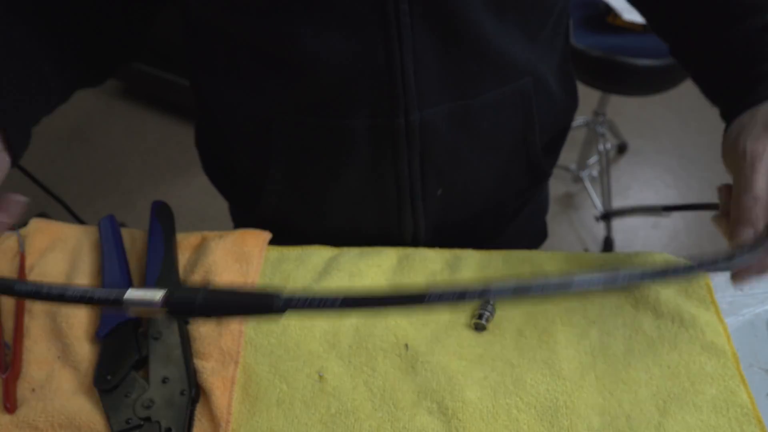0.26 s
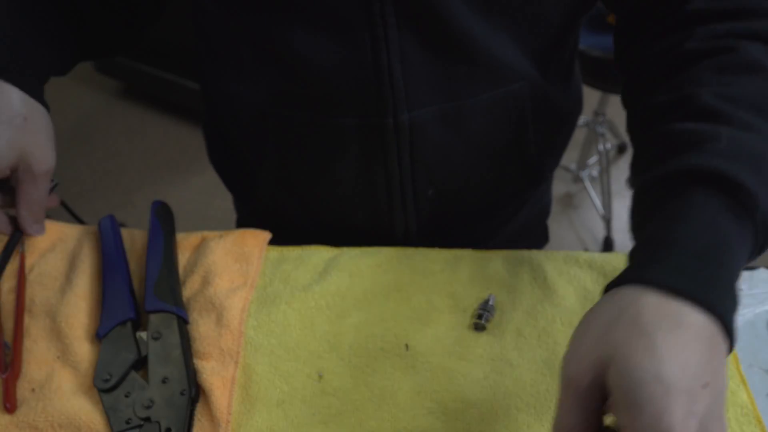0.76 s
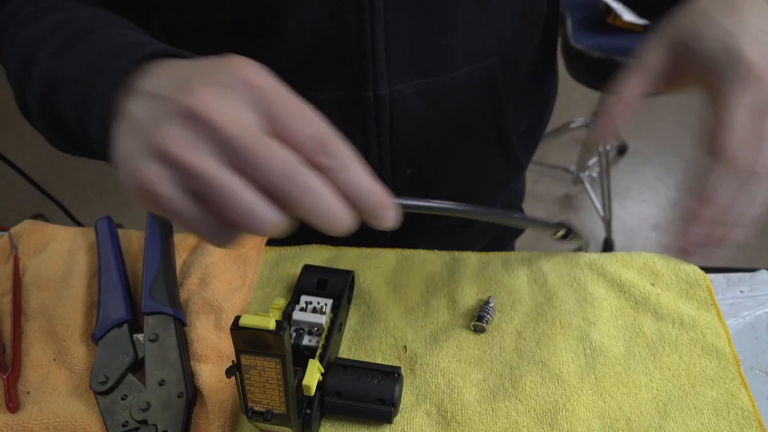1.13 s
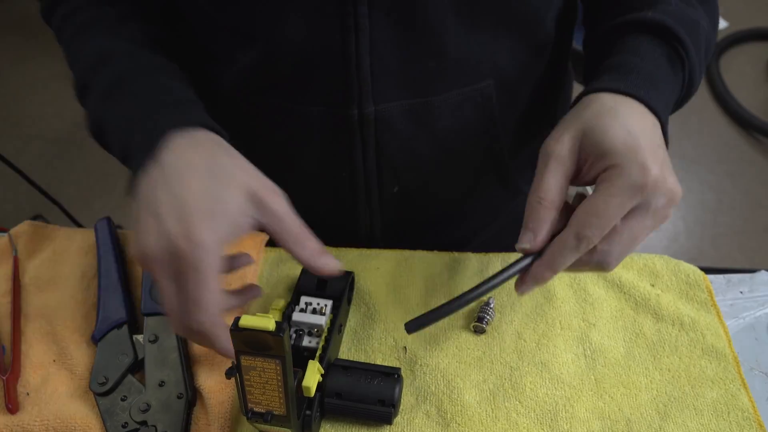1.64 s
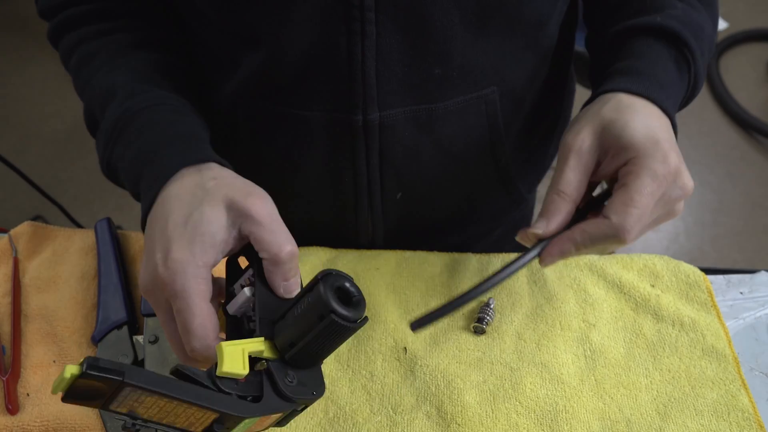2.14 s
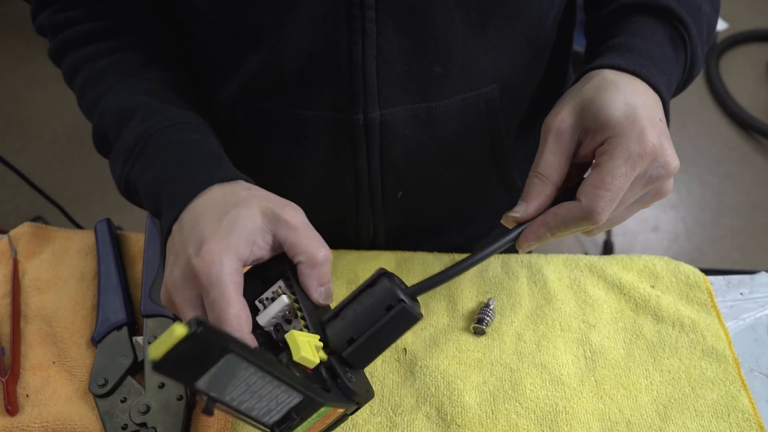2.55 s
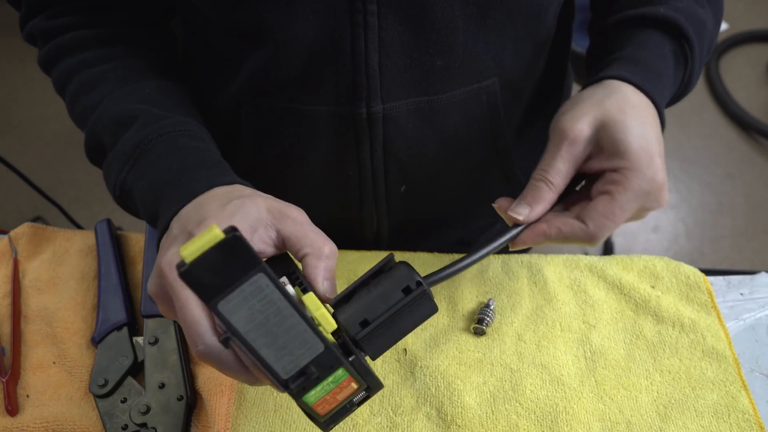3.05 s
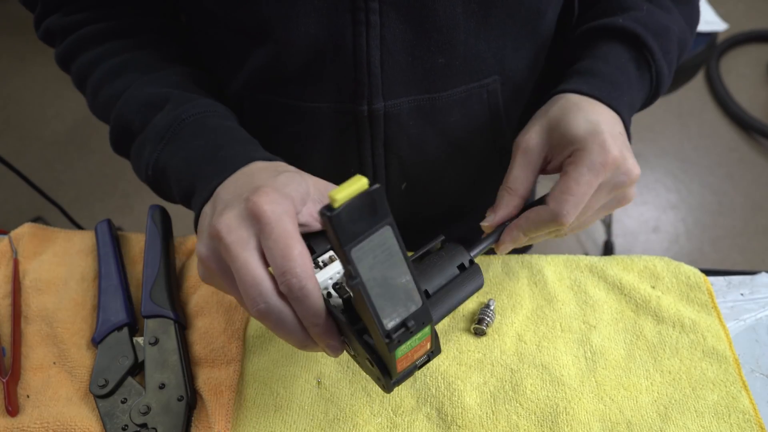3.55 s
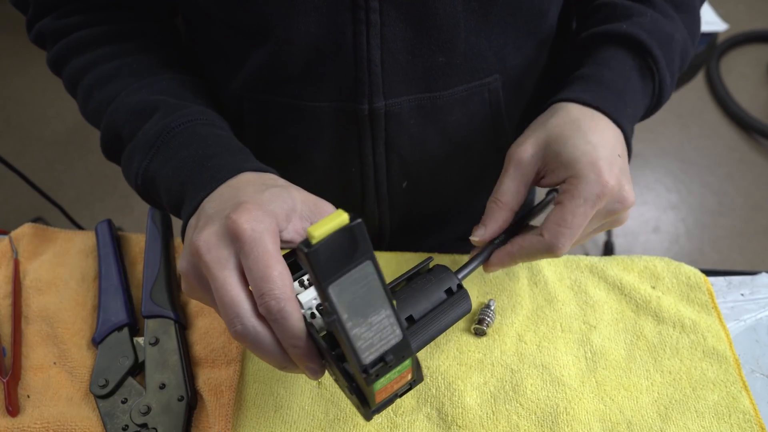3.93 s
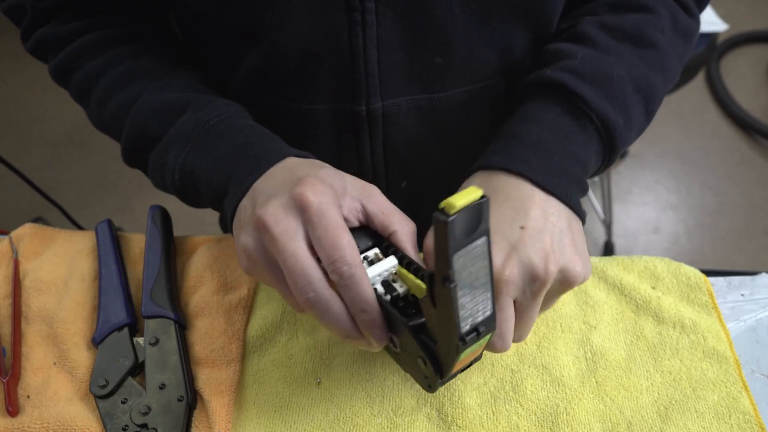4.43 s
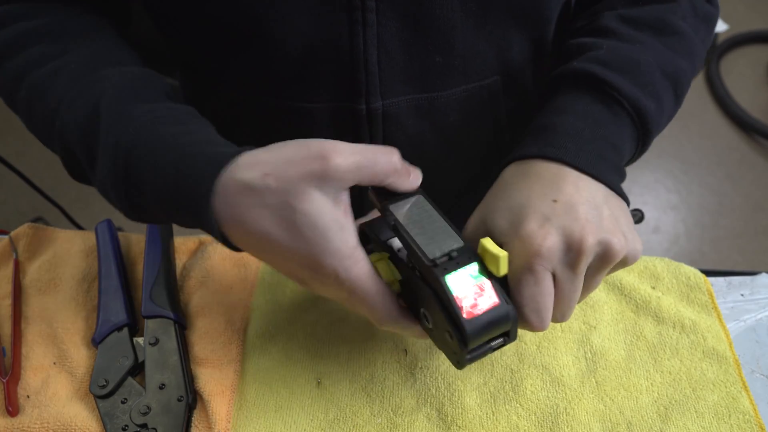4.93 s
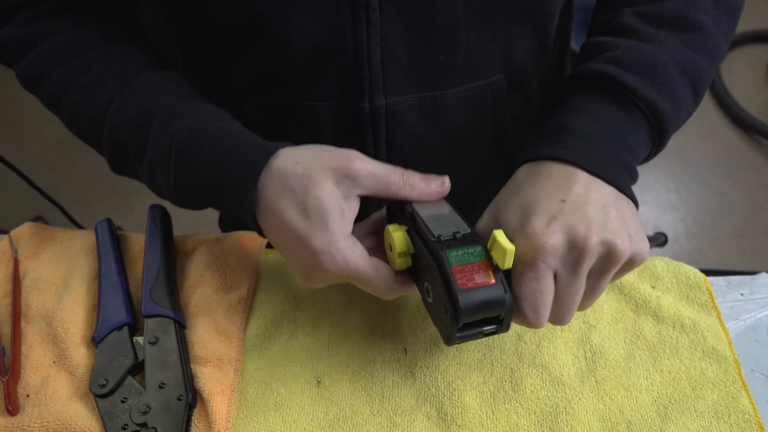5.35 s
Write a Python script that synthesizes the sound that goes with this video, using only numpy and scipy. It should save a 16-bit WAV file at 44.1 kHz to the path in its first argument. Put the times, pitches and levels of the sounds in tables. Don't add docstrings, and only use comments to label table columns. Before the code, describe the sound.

Close, dry view of bench work: quiet cloth rustle and fan hum, a dull bump on a towel, then irregular dry clicks and gritty slips of cable against a small plastic shell. Some clicks are crisp, others chatter loosely. Near the end the clicks thicken and a hinged lid snaps shut with one bright, cracking blow and a brief room tail, followed by a small click or two.

```python
import sys
import numpy as np
from scipy import signal
from scipy.fft import rfft, irfft, next_fast_len
from scipy.io import wavfile
from scipy.ndimage import uniform_filter1d

SR = 44100
rng = np.random.default_rng(int(sys.argv[2]) if len(sys.argv) > 2 else 0)


def dump_mix(stems):
    frames = np.atleast_2d(stems).T
    limited = np.clip(frames, -1, 1)
    pcm = np.round(limited * 32767).astype(np.int16)
    wavfile.write(sys.argv[1], SR, pcm)


def voltage_ratio(decibels):
    exponent = np.asarray(decibels, float) / 20
    return 10 ** exponent


N = 246959


def unit(x):
    return x / np.sqrt(np.mean(x ** 2))


def along(points, hz):
    p = np.array(points, float)
    return np.interp(np.log(hz + 1), np.log(p[:, 0]), p[:, 1])


def tinted(x, points):
    size = next_fast_len(len(x))
    hz = np.arange(size // 2 + 1) * SR / size
    return irfft(rfft(x, size) * voltage_ratio(along(points, hz)), size)[:len(x)]


def band(x, lo_hz, hi_hz):
    sos = signal.butter(2, [lo_hz, min(hi_hz, .45 * SR)], "band", fs=SR, output="sos")
    return signal.sosfilt(sos, x)


def walk(rate):
    hold = int(SR / rate)
    steps = np.repeat(rng.standard_normal(N // 256), hold)[:N]
    w = uniform_filter1d(uniform_filter1d(steps, hold), hold)
    return w / w.std()


def swells(rows, rest_db):
    t = np.arange(N) / SR
    power = voltage_ratio(rest_db) ** 2
    for s, hold, db, fade in rows:
        away = np.maximum(np.maximum(s - t, t - s - hold), 0)
        power = power + voltage_ratio(db - fade * away) ** 2
    return np.sqrt(power)


def add(out, s, y):
    i = int(s * SR)
    out[i:i + len(y)] += y[:len(out) - i]


def ring(hz, width_hz, gain, count=1024):
    t = np.arange(count)[:, None] / SR
    envelope = (1 - np.exp(-2 * hz * t)) * np.exp(-np.pi * width_hz * t)
    y = (gain * envelope * np.sin(2 * np.pi * hz * t)).sum(axis=1)
    return y / np.abs(y).max()


def chatter(ms, luck):
    t_ms = np.arange(len(luck)) / SR * 1000
    ms = max(ms, .05)
    uneven = luck * np.abs(luck) ** .5
    build = 1 - np.exp(-t_ms / (0.11 * ms))
    thin_out = np.exp(-(t_ms / (0.66 * ms)) ** 2) + 0.22 * np.exp(-t_ms / (2.5 * ms))
    return uneven * build * thin_out


def fan():
    # (f/Hz, rms level/dB, wobble/dB, wobble rate/Hz)
    tones = [(31.2, -66.5, 2, 9), (58.6, -54.5, -0.2, 12), (117.5, -77.5, 2.5, 13), (243, -87, 4.5, 4.3),
             (294, -82, 3, 3.3), (342, -85.5, 4, 5), (462, -79, 3, 19), (506, -88.5, 2, 12),
             (583.2, -69, 0.97, 7.2), (637, -81.5, 3.5, 8.6)]
    # (f/Hz, level per Hz/dB)
    air = [(15, -97), (40, -96), (80, -91.5), (120, -91), (180, -95.5), (450, -98.5), (620, -97.5),
           (900, -103), (2000, -109), (3600, -120), (9000, -126), (12500, -127), (16000, -128),
           (17000, -130)]
    t = np.arange(N) / SR
    out = tinted(rng.standard_normal(N) * np.sqrt(SR / 2), air)
    for hz, db, wobble_db, rate in tones:
        level = np.sqrt(2) * voltage_ratio(db + wobble_db * walk(rate))
        phase = .25 * wobble_db * walk(rate) + rng.uniform(0, 2 * np.pi)
        out += level * np.sin(2 * np.pi * hz * t + phase)
    return out


def rubbing():
    # (t/s, level/dB)
    sleeves = [(0, -83), (.26, -77.5), (1.1, -80), (1.48, -75), (1.72, -81), (2.39, -85.5), (2.67, -80.5),
               (2.81, -85), (3.12, -90), (3.27, -70), (3.46, -94), (3.63, -86), (4.2, -85.5), (4.46, -76),
               (4.82, -79), (5.02, -74.5), (5.54, -80), (5.6, -72.5)]
    # (t/s, hold/s, level/dB, fade/(dB/s))
    strokes = [
        (0, .14, -79.5, 140),
        (1.35, .14, -83, 70),
        (1.91, .05, -88, 200),
        (4.46, .02, -89, 70),
        (4.7, .4, -92.5, 40),
        (5.2, .07, -87, 58.5),
    ]
    # (t/s, hold/s, level/dB, fade/(dB/s))
    scrapes = [
        (1.22, .01, -77, 45),
        (1.48, .02, -80, 24),
        (1.93, 0.28, -73.5, 45),
        (2.97, .02, -79.5, 47),
        (3.27, 0.0092, -69, 92),
        (3.96, .03, -78.5, 28),
        (4.4, .01, -70, 138),
        (4.6, .15, -85, 30),
        (4.9, 0.1, -70.5, 52),
        (5.53, .02, -81, 39),
    ]
    rustle_db = np.interp(np.arange(N) / SR, *np.transpose(sleeves))
    rustle = unit(band(rng.standard_normal(N), 3000, 11000)) * voltage_ratio(rustle_db - 1.5 + walk(36))

    fine_hiss = unit(band(rng.standard_normal(N), 12500, 16500))
    skin = fine_hiss * voltage_ratio(walk(25)) * swells(strokes, -102)

    slips = rng.standard_normal(N) * (rng.random(N) < .03) * voltage_ratio(3.1 * walk(90))
    grit = unit(unit(band(slips, 900, 3200)) + 0.36 * unit(band(slips, 3200, 9000)))
    return rustle + skin + grit * swells(scrapes, -87)


def tinks():
    # (t/s, peak level/dB)
    touches = [
        (1.072, -79),
        (1.125, -79),
        (1.148, -81),
        (1.164, -68),
        (1.182, -79),
    ]
    # (f/Hz, width/Hz, level/dB)
    modes = [(10700, 30, 2), (12300, 35, -5), (14600, 50, -7)]
    hz, width, mode_db = np.array(modes, float).T
    out = np.zeros(N)
    for (s, db), luck in zip(touches, rng.standard_normal((len(touches), 3))):
        add(out, s, voltage_ratio(db) * ring(hz, width, voltage_ratio(mode_db + 3 * luck), count=4096))
    return out


def thuds():
    # (t/s, peak level/dB, f/Hz, time to fade by 60 dB/s)
    bumps = [
        (1.166, -49, 110, 0.13),
        (1.185, -57, 198, 0.14),
    ]
    out, t = np.zeros(N), np.arange(8192) / SR
    for s, db, hz, t60 in bumps:
        dull = unit(band(rng.standard_normal(len(t)), 120, 1700))
        fade = np.exp(-np.log(1000) * t / t60)
        add(out, s, voltage_ratio(db) * fade * (np.sin(2 * np.pi * hz * t) + 0.24 * dull))
    return out


def slides():
    # (t/s, length/s, level/dB, lowest f/Hz, highest f/Hz)
    slips = [(1.169, .05, -76, 900, 4500), (2.152, 0.056, -74.5, 2500, 15000),
             (2.605, .012, -71, 4500, 13000), (2.616, 0.0082, -52.5, 750, 6500),
             (2.634, 0.025, -65, 2500, 10000), (3.274, .015, -63, 1500, 9000),
             (3.286, .01, -58, 1300, 10000), (3.299, 0.011, -57, 1300, 10000),
             (4.327, .05, -71.5, 5000, 15500), (4.562, 0.0037, -58, 1410, 5500),
             (4.599, .02, -72, 1700, 8000), (4.933, 0.016, -52, 1500, 9000),
             (5.197, 0.024, -56, 1500, 6000)]
    out, t = np.zeros(N), np.arange(8192) / SR
    for (s, length, db, lo_hz, hi_hz), luck in zip(slips, rng.standard_normal((len(slips), len(t)))):
        shape = (1 - np.exp(-t / (.15 * length))) * np.exp(-(t / length) ** 2)
        grains = unit(band(luck * np.abs(luck), lo_hz, hi_hz))
        add(out, s, voltage_ratio(db) * shape * grains)
    return out


def contacts():
    # (t/s, shell peak level/dB, ribs over shell/dB)
    faint = [(2.0454, -66, 5), (2.0912, -63, -10.1), (2.2502, -53.5, -11), (2.563, -61, -2),
             (2.587, -56, -12), (2.604, -58, -1), (2.851, -58, -6), (2.9981, -56, -2), (3.1767, -57, -15),
             (3.1832, -56, -4), (3.4017, -61, -2), (3.477, -51.5, -12), (3.602, -66.5, 5),
             (3.6446, -71, 2.1), (4.3833, -58, 1.5), (4.4282, -55.5, -14), (4.5931, -64, 7),
             (4.6178, -70, 6), (5.0444, -66, -5), (5.0854, -58.5, 2), (5.1553, -64, 8.5), (5.5054, -57, -5)]
    # (t/s, shell peak level/dB, shell f/Hz, ribs over shell/dB, steel over shell/dB)
    crisp = [(2.0488, -55.5, 1910, 2, -1), (2.064, -51, 2140, -3.5, -17), (2.211, -57.5, 1650, 5, 1.5),
             (2.6194, -37.5, 1990, 3.5, -15), (2.6295, -54.5, 2700, 14, 16.5),
             (2.9693, -51, 2140, -6.5, -21), (3.0051, -49, 2140, -13, -20),
             (3.2395, -47.5, 1910, -5, -19.5), (3.2637, -29, 2340, -4, -5), (3.2868, -47.5, 1520, -2, -4),
             (3.3013, -46, 2490, -12, -16), (3.3092, -49.5, 1730, 1.5, -10),
             (3.4909, -48.5, 2510, -18, -26), (4.5636, -37, 2280, -6, -22), (4.937, -37, 1950, -2.5, -14),
             (4.9826, -34.5, 1900, 4, -2.5), (5.1902, -47, 1730, -17.5, -25.5),
             (5.2119, -32.5, 1760, 3.5, -9.5)]
    # (t/s, shell peak level/dB, shell f/Hz, ribs over shell/dB, steel over shell/dB)
    loose = [(1.169, -63, 1900, 2, 0.5), (2.8555, -50.5, 1920, -16, -26), (2.8891, -42, 2770, -6.5, -19.5),
             (3.2126, -51, 2700, 1, -12), (3.2495, -50, 2130, -8, -13), (4.6007, -56, 1960, -2.1, -16),
             (4.848, -54, 1960, -2, -11), (4.8594, -59.5, 1800, 4.5, -5), (4.946, -46, 2100, 7, -8),
             (4.9673, -50, 2800, -5, -6.5), (5.1824, -49, 2170, -6.5, -19),
             (5.1989, -46.5, 1790, -13, -20.5), (5.2083, -33, 1808, -12, -22.5),
             (5.4534, -46, 1760, -12, -26)]
    rows = []
    for s, db, rib in faint:
        rows.append((s, db, 2130, .08, db + rib, db + rib - 8.5, 1))
    for table, usual_ms in ((crisp, 1.75), (loose, 3.3)):
        for s, db, hz, rib, steel in table:
            ms = usual_ms * voltage_ratio(.2 * (-45.5 - db - max(rib, 0)))
            rows.append((s, db, hz, 0, db + rib, db + steel, ms))
    return sorted(rows)


def ticks():
    # (f/Hz, width/Hz)
    ribs = [(3400, 500), (4300, 550), (5400, 700), (6400, 1100)]
    # (f/Hz, width/Hz, level/dB)
    steel_parts = [(7810, 600, 1), (9000, 1200, -4), (10500, 800, -5), (12700, 1100, -7),
                   (14500, 1600, -7.5)]
    rib_hz, rib_width = np.array(ribs, float).T
    steel_hz, steel_width, steel_tone_db = np.array(steel_parts, float).T
    shell_ratio, shell_width = np.array([.6, 1, 1.3]), np.array([700, 480, 800])
    shell_gain = voltage_ratio(np.array([-6, 0, -4]))
    out = np.zeros(N)
    rows = contacts()
    for row, luck in zip(rows, rng.standard_normal((len(rows), 1024))):
        s, shell_db, hz, scatter, rib_db, steel_db, ms = row
        hz = hz * (1 + scatter * luck[-1])
        shell = ring(hz * shell_ratio, shell_width, shell_gain)
        rib = ring(rib_hz * (1 + 0.059 * luck[-4:]), rib_width, voltage_ratio(1.5 * luck[-8:-4]))
        steel_gain = voltage_ratio(steel_tone_db + 2.7 * luck[-18:-13])
        steel = ring(steel_hz * (1 + 0.052 * luck[-13:-8]), steel_width, steel_gain)
        for db, body in ((shell_db, shell), (rib_db, rib), (steel_db, steel)):
            y = signal.fftconvolve(chatter(ms, luck), body)
            add(out, s - .0003, voltage_ratio(db + 3.5) * y / np.abs(y).max())
    return band(out, 920, 17000)


def snap():
    # (t/s, blow level/dB, chatter/ms)
    latch = [
        (5.2446, -17, 1.3),
        (5.24630, 0, .1),
        (5.24683, -4, .1),
        (5.2478, -14, 1.0),
        (5.2500, -19, 1.0),
        (5.2526, -21, 1.0),
    ]
    # (f/Hz, width/Hz, level/dB)
    lid = [(344, 300, -15.5), (750, 454, -1.35), (1230, 900, -10.5), (1900, 320, -3), (2500, 410, -7),
           (3235, 130, -9), (3790, 300, -15), (4500, 360, -16), (5800, 780, -20.5), (6620, 300, -17.5),
           (7940, 440, -17), (8620, 440, -18.5), (10140, 400, -19), (10940, 290, -18), (12800, 980, -19.5),
           (14200, 610, -19), (15000, 600, -22.5)]
    # (f/Hz, level/dB)
    wash = [(88, -63), (150, -31.5), (479, -7), (830, -4.5), (1230, -10.5), (1900, 0), (2870, -13),
            (3420, -4.5), (4690, -24), (5590, -14.5), (7970, -10.5), (10100, -13.5), (13800, -17.5),
            (15600, -20.5), (16500, -38.5)]
    start_s, landing_s = latch[0][0], latch[1][0]
    hz, width, db = np.array(lid, float).T
    blows = np.zeros(2048)
    for (s, blow_db, ms), luck in zip(latch, rng.standard_normal((len(latch), 512))):
        rattle = chatter(ms, luck)
        rattle = ms / (ms + .5) * rattle / np.abs(rattle).max()
        rattle[0] = 1
        add(blows, s - start_s, voltage_ratio(blow_db) * rattle)

    gain = voltage_ratio(db) * width * (-1) ** np.arange(len(hz))
    front = band(signal.fftconvolve(blows, ring(hz, 1.55 * width, gain)), 260, 17000)
    front *= voltage_ratio(-.3) / front[np.abs(front).argmax()]

    around = tinted(signal.unit_impulse(512, "mid"), wash)
    around *= voltage_ratio(-1) * np.sqrt(np.sum(front ** 2) / np.sum(around ** 2))
    out = np.zeros((2, N))
    add(out[0], start_s, front)
    add(out[1], landing_s - 256 / SR, around)
    return out


def room(x):
    # (f/Hz, time to fade by 60 dB/s)
    fade_times = [(150, .25), (600, 0.27), (2000, 0.27), (4000, .3), (8000, 0.28), (15000, 0.22)]
    # (f/Hz, level/dB)
    colour = [(150, 0.5), (2000, 4), (6000, 1), (15000, 2)]
    room_db, gap_s, bench_db, bench_s = -15, 0.0041, 4, 0.012
    t = np.arange(SR // 2) / SR
    tail = np.zeros(len(t))
    for hz in 100 * 2 ** np.arange(0, 7.6, .5):
        noise = band(rng.standard_normal(len(t)), hz / 2 ** 0.32, hz * 2 ** 0.35)
        tail += noise * np.exp(-np.log(1000) * t / along(fade_times, hz))
    onset = np.clip((t - gap_s) / 0.0016, 0, 1)
    bench = 1 + voltage_ratio(bench_db) * np.exp(-t / bench_s)
    tail = tinted(tail, colour) * onset * bench
    return voltage_ratio(room_db) * signal.fftconvolve(x, tail / np.sqrt(np.sum(tail ** 2)))[:N]


def scene():
    small = ticks() + slides() + thuds()
    front, around = snap()
    reflections = room(small + around)
    return (small + front + reflections + rubbing() + fan() + tinks())[None]


def starve(x):
    # (lowest f/Hz, silent below level/dB)
    limits = [(12800, -97.5), (13700, -97.5), (14500, -93), (15800, -80)]
    hz, _, z = signal.stft(x, SR, nperseg=2048)
    edges = [row[0] for row in limits] + [SR]
    for (lo, db), hi in zip(limits, edges[1:]):
        rows = (hz >= lo) & (hz < hi)
        power = np.sum(np.abs(z[:, rows]) ** 2, axis=1, keepdims=True)
        z[:, rows] *= power > voltage_ratio(db) ** 2
    return signal.istft(z, SR, nperseg=2048)[1][:, :N]


def low_pass(x):
    return signal.sosfilt(signal.butter(12, 17120, fs=SR, output="sos"), x)


def record(dry):
    top_cut = signal.ellip(8, .2, 60, 16900, fs=SR, output="sos")
    mix = starve(signal.sosfilt(top_cut, dry))
    return low_pass(mix)


dry = scene()
out = record(dry)
dump_mix(out)
```